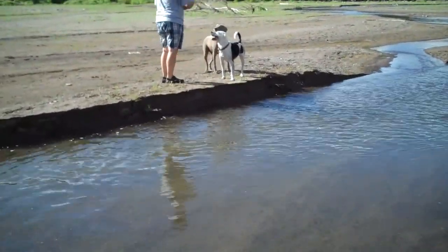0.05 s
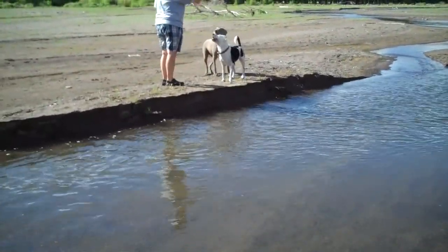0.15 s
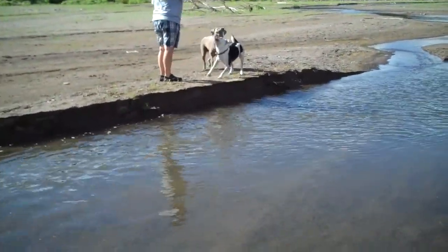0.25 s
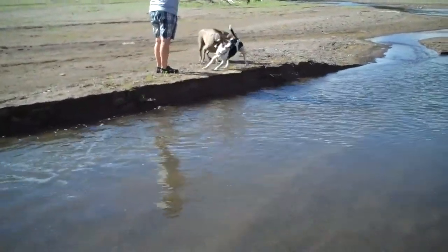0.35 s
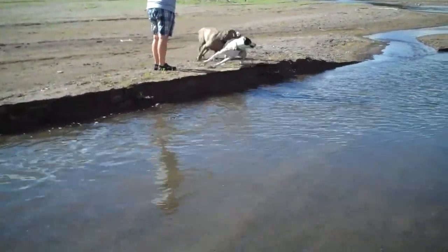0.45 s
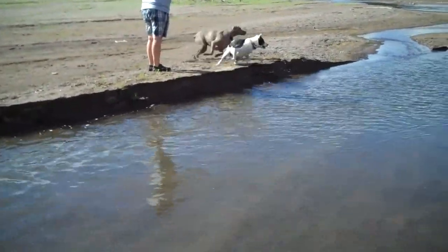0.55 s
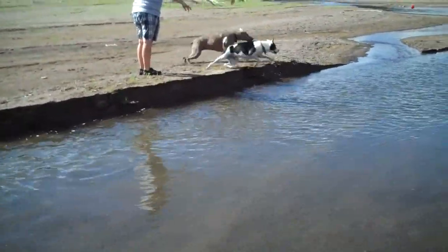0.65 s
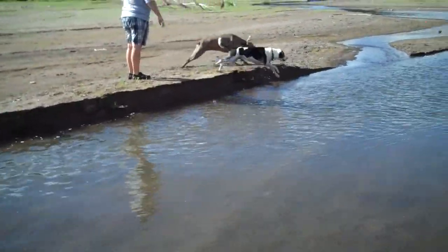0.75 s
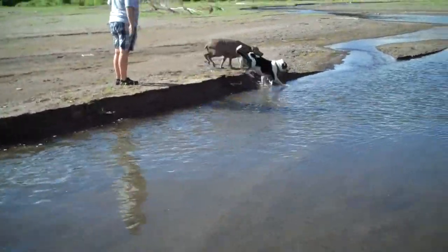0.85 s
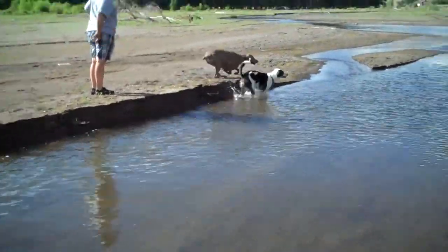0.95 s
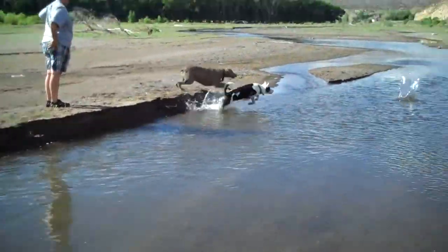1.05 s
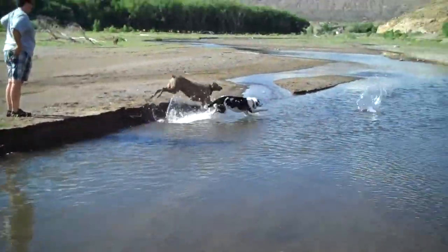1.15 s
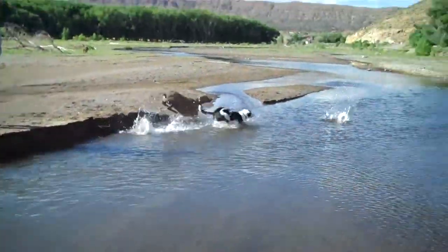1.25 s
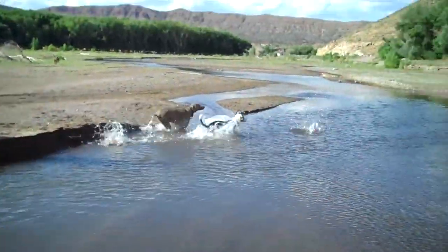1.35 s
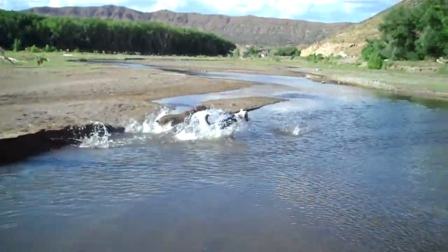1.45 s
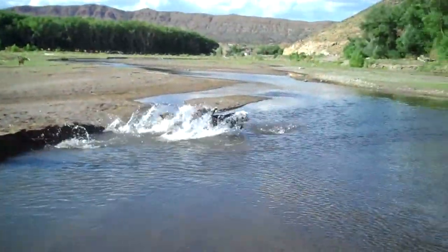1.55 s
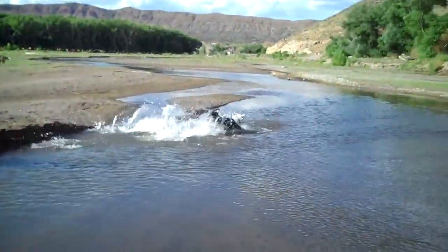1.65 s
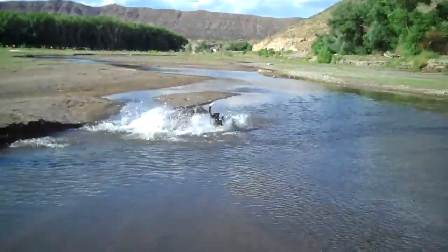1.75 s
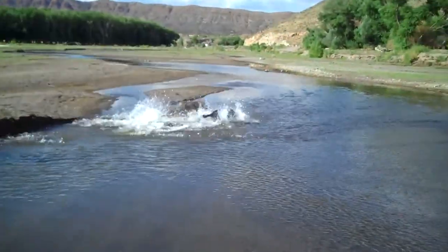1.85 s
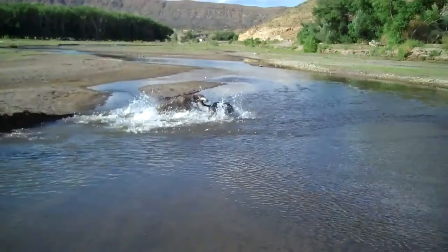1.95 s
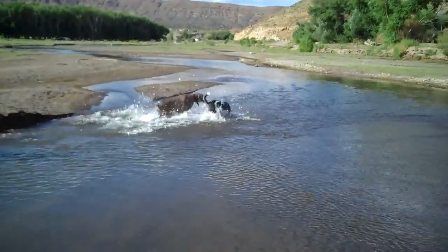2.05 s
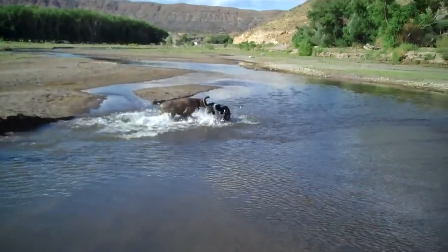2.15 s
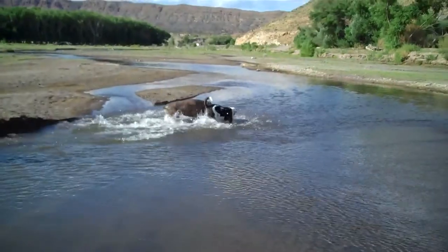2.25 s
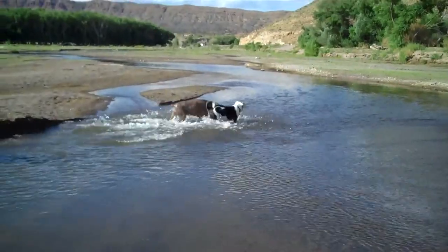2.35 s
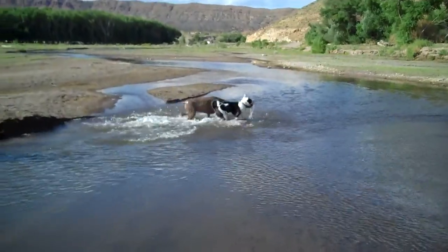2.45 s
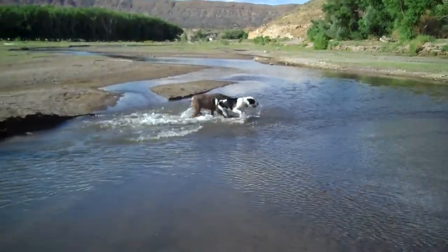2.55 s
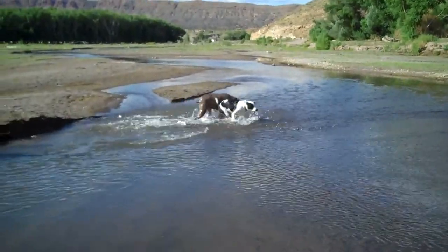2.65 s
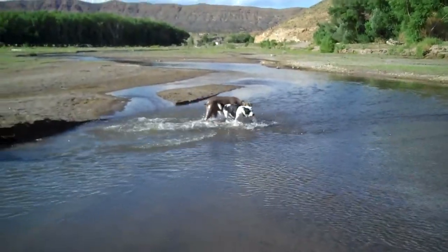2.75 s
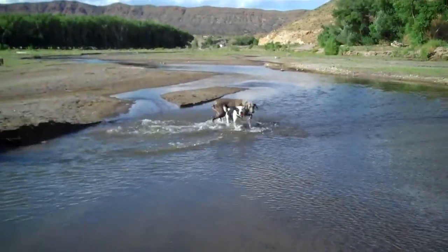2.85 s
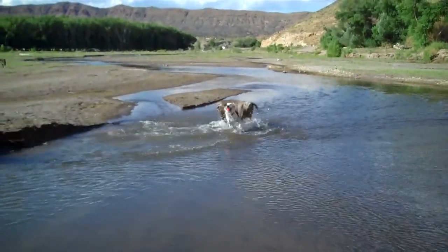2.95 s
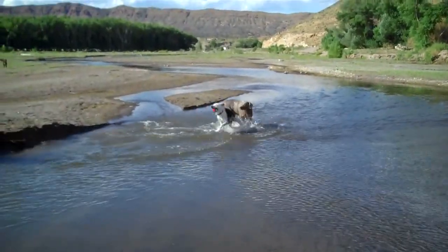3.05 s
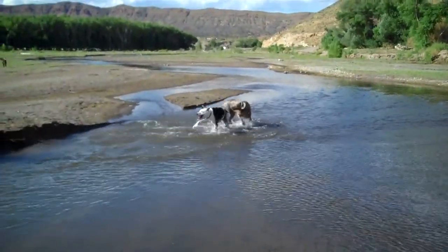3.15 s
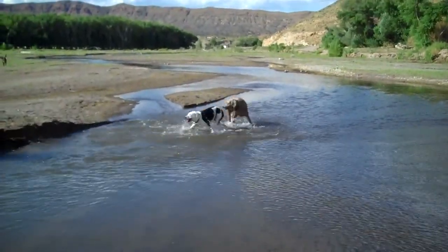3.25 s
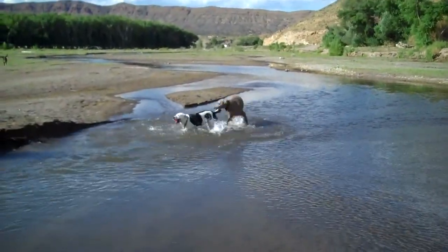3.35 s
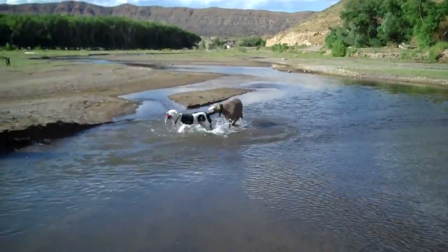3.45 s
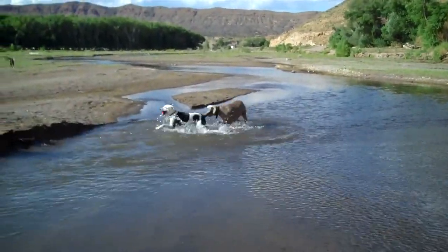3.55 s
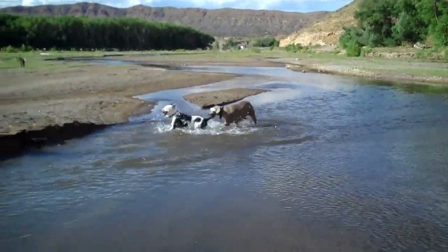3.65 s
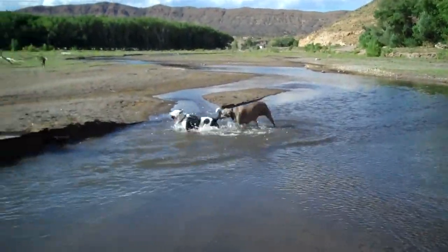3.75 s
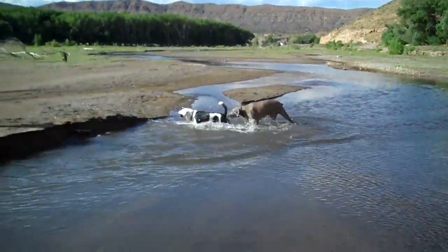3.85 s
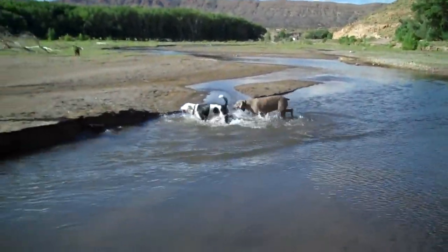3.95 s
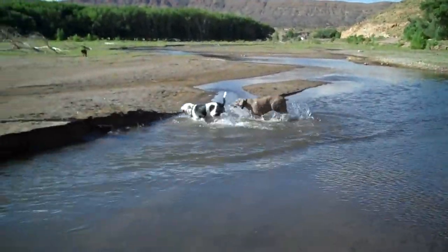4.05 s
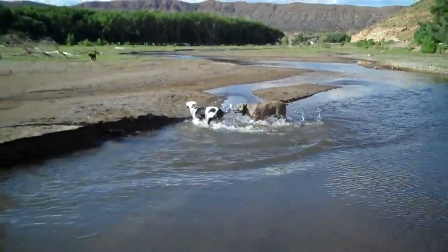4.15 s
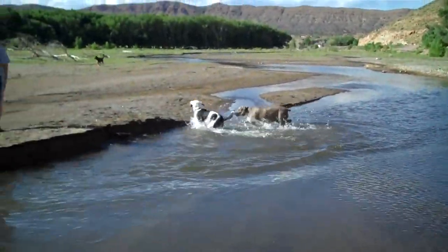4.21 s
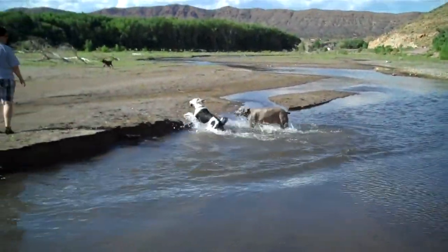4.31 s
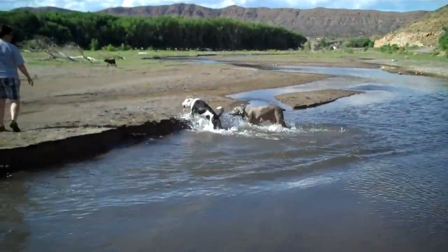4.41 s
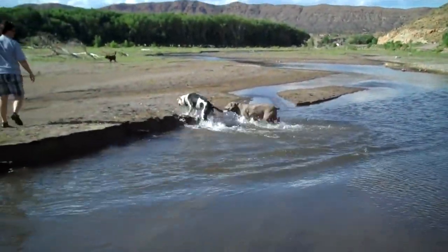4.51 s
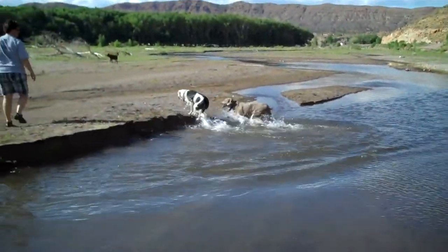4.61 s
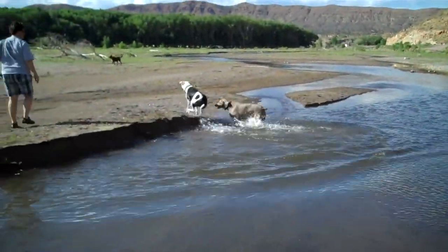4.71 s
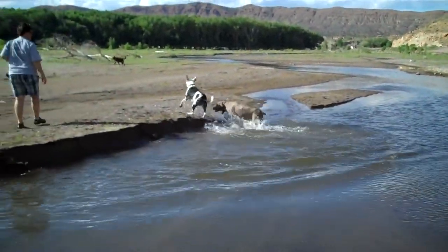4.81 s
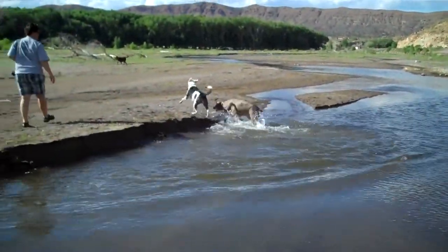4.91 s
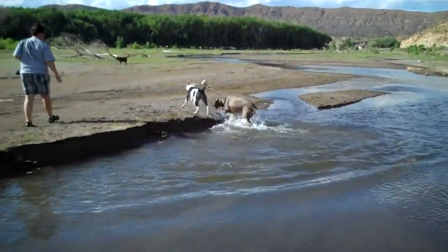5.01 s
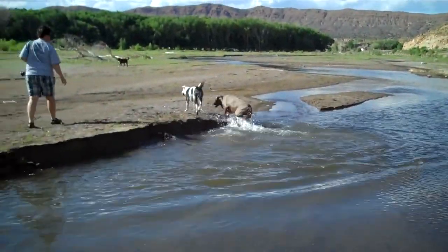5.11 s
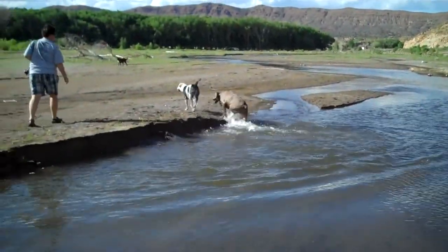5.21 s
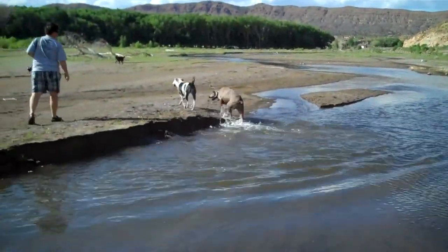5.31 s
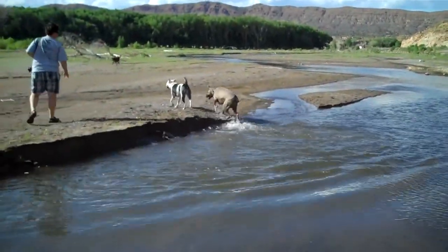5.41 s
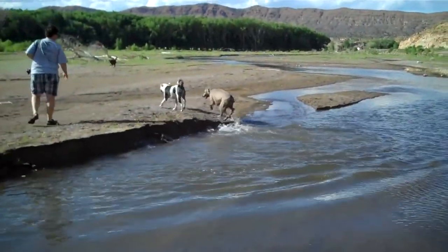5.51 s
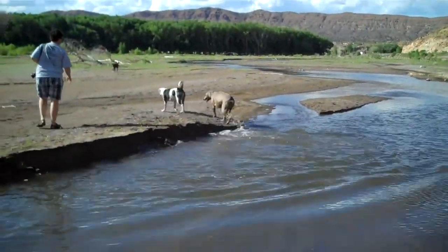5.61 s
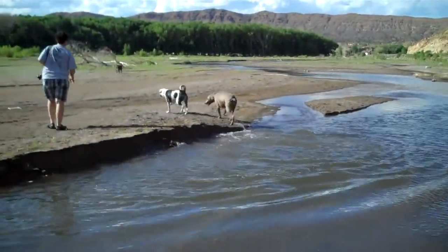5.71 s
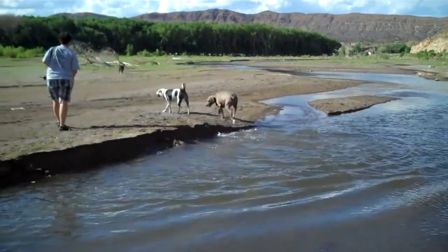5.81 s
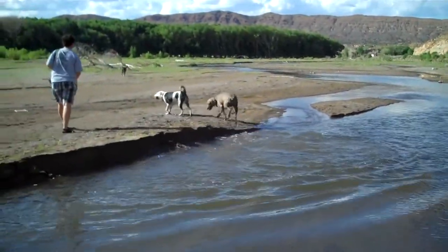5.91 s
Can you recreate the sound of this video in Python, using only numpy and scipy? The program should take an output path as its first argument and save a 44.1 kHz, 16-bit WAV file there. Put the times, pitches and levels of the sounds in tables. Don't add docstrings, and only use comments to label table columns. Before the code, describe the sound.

An open riverside, heard through a small handheld stereo camera microphone some metres away. At first there is only a smooth far water hiss, low wind buffets and a few tiny ticks. From about 0.7 s grit crackles off the mud bank as two dogs leap; at 1.0 s a hard, crisp slap opens the splashing. Between 1.2 and 2.1 s it is thickest: bright fizzing spray, pattering drops, dull paw slaps and hollow gulps of trapped air. From 2.3 to 3 s it thins to sloshing and separate bubbles. Fresh slaps and plops come at 3.0, 3.45, 3.7 and 3.9 s, with wind thumps around 3.2 to 3.4 and at 3.8 s. Splashing swells again from 4.0 to 4.9 s while wet coats trickle. After 5 s it falls away to a small slap, drips, little bubbles, a rising plop near 5.75 s, and grit ticks.

```python
import sys
import numpy as np
from scipy import signal
from scipy.fft import rfft, irfft, next_fast_len
from scipy.io import wavfile
from scipy.ndimage import uniform_filter1d

SR = 44100
rng = np.random.default_rng(int(sys.argv[2]) if len(sys.argv) > 2 else 0)


def invert_db(x):
    u = np.asarray(x, float) / 20
    return 10 ** u


def to_wav(s):
    ch = np.atleast_2d(s).T
    pcm = np.round(np.clip(ch, -1, 1) * 32767)
    wavfile.write(sys.argv[1], SR, pcm.astype(np.int16))


N = 263404


def evened(x):
    return x / np.sqrt(np.mean(x ** 2, axis=-1, keepdims=True) + 1e-20)


def read(points, hz):
    point_hz, value = np.transpose(points)
    return np.interp(np.log(hz + 1), np.log(point_hz + 1), value)


def curve(table, column):
    rows = np.array(table)
    return np.interp(np.arange(N) / SR, rows[:, 0], rows[:, column])


def add(mix, start_s, sound):
    part = mix[round(start_s * SR):][:len(sound)]
    part += sound[:len(part)]


def filtered(x, response):
    size = next_fast_len(N + 4096)
    return irfft(rfft(x, size) * response(np.fft.rfftfreq(size, 1 / SR)), size)[..., :N]


def causal(points):
    gain = invert_db(read(points, np.fft.rfftfreq(4096, 1 / SR)))
    cepstrum = irfft(np.log(gain))
    cepstrum[1:2048] *= 2
    cepstrum[2049:] = 0
    return irfft(np.exp(rfft(cepstrum)))[:2048]


def flutter(smooth_s, channels=1):
    size = max(round(smooth_s * SR), 2)
    once = uniform_filter1d(rng.standard_normal((channels, N)), size)
    return evened(uniform_filter1d(once, size))


def soft(sound):
    return sound * np.sqrt(np.hanning(len(sound)))


def ring(pitch_hz, rise_octaves, length_s):
    u = np.arange(max(round(length_s * SR), 4)) / (length_s * SR)
    phase = 2 * np.pi * np.cumsum(pitch_hz * 2 ** (rise_octaves * u)) / SR
    return np.sin(phase) * np.sin(np.pi * u ** 0.53) ** 1.26


def grains(tone, cycles, rise_octaves, per_s, spread_db, clump_db, clump_s, count=28):
    size = invert_db(spread_db * np.minimum(rng.exponential(1, N), 5)) * rng.choice([-1, 1], N)
    size *= (rng.random(N) < per_s / SR) * invert_db(clump_db * flutter(clump_s)[0])
    kind = rng.integers(0, count, N)
    out, power = np.zeros(N), 1e-3
    lowest_hz, highest_hz = tone[0][0], tone[-1][0]
    for k, hz in enumerate(np.geomspace(lowest_hz, highest_hz, count)):
        grain = ring(hz, rise_octaves, cycles / hz)
        grain = grain / np.linalg.norm(grain)
        out += signal.oaconvolve(size * (kind == k), grain)[:N]
        power = power + abs(rfft(grain, 4096)) ** 2

    def colour(hz):
        own = np.interp(hz, np.fft.rfftfreq(4096, 1 / SR), np.sqrt(power))
        return np.minimum(hz / lowest_hz, 1) ** 2 * invert_db(read(tone, hz)) / own
    return evened(filtered(out, colour))


def swells(peak_s, peak_db, fall_s, rise_share):
    t = np.arange(0, N / SR + .01, .002)
    late = (t - peak_s[:, None]) / np.maximum(fall_s, .01)[:, None]
    level_db = peak_db[..., None] - 10 * np.maximum(late, -late / rise_share)
    power = (invert_db(level_db) ** 2).sum(-2)
    return np.array([np.interp(np.arange(N) / SR, t, row) for row in np.atleast_2d(power)])


# [dB, how far legs work under the surface]
THRASHING = [(0, -80, 8), (.23, -60, -13), (.35, -41, -21), (.86, -47.5, -10), (.97, -63, -12),
             (1.13, -33, -1.5), (1.25, -33, -4.5), (1.5, -30.5, 0), (1.9, -28.5, -3), (2.3, -32, -2),
             (2.46, -37, -3.5), (3.0, -37.5, -2.5), (3.62, -37, -3.5), (4.0, -32, -7.5), (4.75, -32.5, -3),
             (5.3, -37.5, -6), (5.56, -43.5, -13.5), (5.97, -46.5, -19)]
# peak_s [s], effort_db [dB], depth_db [dB], fall_s [s per 10 dB]
LUNGES = [(.78, -39, -17, 0.17), (.935, -31, -20, 0.09), (1.009, -25.5, -9.5, 0.085),
          (1.058, -24.5, -4.5, 0.0478), (1.095, -37.5, 4, -0.0262), (1.211, -25, -10.5, 0.07),
          (1.279, -21.5, -18, 0.046), (1.33, -23, -7, 0.0726), (1.374, -22, -1.5, 0.052),
          (1.44, -29.5, 2.5, 0.0366), (1.561, -27.5, -2, 0.03), (1.648, -24.5, -8, 0.07),
          (1.71, -28.5, -16, 0.15), (1.76, -22.5, -8, 0.1358), (1.81, -39, 3, -0.01), (1.9, -37, 3.5, 0.08),
          (2.2, -38, 2, 0.06), (2.28, -36.5, -17.5, 0.06), (2.49, -37, -3.5, 0.05), (2.56, -37, -7.5, 0.13),
          (2.61, -34, -16, -0.3), (2.69, -33.5, -6.5, 0.12), (2.8, -39.5, 0, -0.1), (2.837, -32.5, 0, 0),
          (2.871, -34.5, 1.5, 0), (3.025, -31.5, -8, 0.09), (3.095, -29, -14, 0.01),
          (3.142, -29.5, -11, 0.04), (3.2, -41.5, 2, -0.03), (3.295, -30, -12, 0.07),
          (3.425, -23.5, -27, -0.0056), (3.452, -29, -2, 0.07), (3.52, -36, 0, 0.1),
          (3.682, -29, -5.5, 0.07), (3.82, -31.5, -1, 0.15), (4.09, -25.5, -7, -0.04),
          (4.199, -29.5, -2, 0.2453), (4.41, -35, -4, 0.09), (4.549, -32, -1, 0.1),
          (4.645, -31, -18.5, 0.07), (5.34, -35.5, -23, 0.08), (5.36, -36, -5.5, -0.04),
          (5.77, -40, -23, 0.02), (5.85, -46, -15, .04), (5.94, -50.5, -11, 0)]
# peak_s [s], effort_db [dB]
FLICKS = [(.24, -48), (.42, -40.5), (.53, -39), (0.886, -38), (1.48, -28), (1.72, -27), (1.836, -29),
          (2.008, -34), (2.098, -27.5), (3.386, -29), (3.56, -32.5), (3.87, -34), (3.934, -32),
          (4.133, -26), (4.452, -41), (4.884, -31), (4.964, -28.5), (5.453, -37), (5.752, -43)]
FLICK_DEPTH_DB, FLICK_FALL_S = -18.5, 0.019
LUNGE_RISE_SHARE = 0.52


def stirred(per_depth, steady_db=0):
    flicks = [(*row, FLICK_DEPTH_DB, FLICK_FALL_S) for row in FLICKS]
    peak_s, effort_db, depth_db, fall_s = np.transpose(LUNGES + flicks)
    steady = invert_db(steady_db + curve(THRASHING, 1) + per_depth * curve(THRASHING, 2))
    bursts = swells(peak_s, effort_db + per_depth * depth_db, fall_s, LUNGE_RISE_SHARE)[0]
    return np.sqrt(steady ** 2 + bursts)


# pitch_hz [Hz], level_db [dB]
SPRAY_TONE = [(700, -16), (1500, -4), (2300, 1), (4000, 0.5), (8000, -2.5), (16000, -6)]


def spray():
    fizz = grains(SPRAY_TONE, cycles=4.0, rise_octaves=.2, per_s=14000,
                  spread_db=1.5, clump_db=1.1, clump_s=.014)
    return invert_db(-4) * stirred(0) * fizz


# pitch_hz [Hz], level_db [dB]
CHURN_TONE = [(250, -22), (420, -7), (600, 1.5), (1200, -1), (2000, -5.5), (4000, -20.5), (8000, -22)]
# pitch_hz [Hz], level_db [dB]
SLOSH_TONE = [(90, -25), (150, -4.5), (280, 4.5), (400, 7.5), (700, -8.5)]
SLOSH_PER_DEPTH = 2.85
STEADY_SLOSH_DB = -3


def churn():
    small = grains(CHURN_TONE, cycles=5.0, rise_octaves=.3, per_s=4500,
                   spread_db=2.0, clump_db=1.05, clump_s=.012)
    large = grains(SLOSH_TONE, cycles=3.0, rise_octaves=.3, per_s=1300,
                   spread_db=1.8, clump_db=1.2, clump_s=.02, count=12)
    small = invert_db(-1.2) * stirred(1) * small
    return small + invert_db(-2.5) * stirred(SLOSH_PER_DEPTH, STEADY_SLOSH_DB) * large


# start_s [s], peak_db [dB], body_db [dB re spatter]
SLAPS = [(0.742, -27, -37), (0.868, -25, -38), (0.93, -22, -6), (0.9914, -21, -21), (1.0009, -6, -13),
         (1.0529, -9, -10), (1.176, -14, -12), (1.211, -11.5, -4), (1.267, -16, -19), (1.318, -19, -7),
         (1.371, -20, -16), (1.73, -21, -17), (3.012, -20.5, -7), (3.6597, -15, -30), (3.916, -12.5, -16),
         (4.0832, -22, 2), (4.38, -20, -22), (4.433, -28, -22), (4.988, -21.5, -7), (5.7664, -28, -29)]


def slaps():
    out, t = np.zeros(N), np.arange(3000) / SR
    body_band = signal.butter(2, [600, 2500], "band", fs=SR)
    for start_s, peak_db, body_db in SLAPS:
        hiss, lumps, thud = rng.standard_normal((3, len(t)))
        lumps_db = 4.0 * evened(uniform_filter1d(lumps, 30))
        spatter = hiss * invert_db(lumps_db) * invert_db(-60 * t / .028)
        body = evened(signal.lfilter(*body_band, thud)) * invert_db(-60 * t / .05)
        add(out, start_s, invert_db(peak_db - 11.0) * (spatter + invert_db(body_db) * body))
    return out


# peak_s [s], peak_db [dB], pitch_hz [Hz], length_s [s]
GULPS = [(0.186, -44, 377, 0.02), (1.01, -33, 625, .014), (1.06, -37, 744, 0.028), (1.09, -31, 494, 0.0258),
         (1.22, -33.5, 550, 0.024), (1.367, -31, 475, 0.022), (1.445, -25, 411, 0.028),
         (1.461, -27, 636, 0.03), (1.64, -28.5, 528, 0.02), (1.723, -21, 388, 0.0091),
         (1.854, -23.5, 272, 0.02), (1.921, -29.5, 303, .03), (2.216, -28, 693, 0.02),
         (2.65, -34, 590, .017), (2.753, -36, 486, 0.014), (2.858, -36, 519, 0.029),
         (3.085, -37, 580, .013), (3.194, -40.5, 554, 0.026), (3.45, -19.5, 488, 0.014),
         (3.503, -28.5, 496, 0.016), (3.595, -34.5, 597, 0.025), (3.858, -24, 423, 0.011),
         (4.19, -29, 446, 0.024), (4.286, -45, 550, 0.019), (4.535, -24, 363, 0.02),
         (4.558, -24, 436, 0.015), (4.779, -35.5, 570, .017), (5.037, -38, 560, 0.02),
         (5.125, -44.5, 257, 0.025), (5.919, -54, 643, 0.021)]
# peak_s [s], peak_db [dB], pitch_hz [Hz]
BUBBLES = [(0.9, -40, 755), (0.9, -41, 925), (1.157, -32.5, 916), (1.011, -28.5, 916), (1.041, -26.5, 1650),
           (1.059, -51, 2050), (2.804, -28, 873), (3.035, -35, 1020), (3.036, -31, 1660),
           (3.303, -34, 1020), (3.451, -30, 1710), (3.453, -32, 2040), (3.499, -32.5, 965),
           (5.208, -33.5, 1140), (5.346, -39, 1520), (5.52, -39, 2200), (5.067, -40, 1105),
           (5.249, -44, 1110), (5.42, -47, 990), (5.528, -44, 1580), (5.573, -47, 1190), (5.69, -49.5, 930),
           (5.758, -57, 2710), (5.845, -46, 2140), (5.946, -47, 1870), (5.822, -52, 960), (5.917, -48, 945),
           (5.928, -51, 1030), (5.939, -46.5, 1120)]
BUBBLE_S = 0.0132
# start_s [s], peak_db [dB], pitch_hz [Hz, at start], rise_octaves [octaves], length_s [s]
PLOP = (5.754, -40, 235, 1.45, .045)


def gulps():
    out = np.zeros(N)
    for peak_s, peak_db, pitch_hz, length_s in GULPS + [(*row, BUBBLE_S) for row in BUBBLES]:
        ring_s = np.clip(1.16 * length_s, .005, 14 / pitch_hz)
        gulp = soft(ring(pitch_hz * 0.945, 0.17, ring_s))
        add(out, peak_s - 0.389 * length_s, invert_db(peak_db + 4.0) * gulp)
    start_s, peak_db, pitch_hz, rise_octaves, length_s = PLOP
    add(out, start_s, invert_db(peak_db) * ring(pitch_hz, rise_octaves, length_s))
    return out


# peak_s [s], peak_db [dB], pitch_hz [Hz]
POCKETS = [(1.057, -39, 487), (1.059, -35.5, 233), (1.12, -34, 617), (1.561, -28, 400), (1.784, -30, 312),
           (1.796, -27, 630), (1.82, -29, 330), (1.918, -28, 595), (1.939, -32, 510), (2.044, -34.5, 606),
           (2.063, -30.5, 578), (2.288, -35, 510), (2.48, -38, 675), (2.811, -37, 670), (2.827, -35, 610),
           (2.871, -34, 720), (3.005, -40, 593), (3.046, -39, 565), (3.103, -38, 694), (3.254, -38, 500),
           (3.536, -34, 547), (3.706, -34.5, 584), (3.746, -37.5, 602), (3.834, -37, 610),
           (3.882, -31, 506), (3.921, -39, 710), (4.245, -41, 559), (4.278, -29.5, 590),
           (4.313, -29.5, 680), (4.371, -32.5, 633), (4.494, -34, 437), (4.558, -26, 630),
           (4.599, -37, 616), (4.8, -37, 503), (4.815, -32.5, 460), (4.831, -34, 670), (4.92, -46, 450),
           (4.928, -37, 667), (5.068, -36, 620)]
# peak_s [s], peak_db [dB], pitch_hz [Hz]
DRIPS = [(0.899, -42, 1959), (0.922, -41, 1580), (0.965, -38.5, 940), (0.99, -38, 2411),
         (1.01, -38.5, 2500), (1.011, -37, 2971), (1.018, -34, 1701), (1.019, -31, 2217),
         (1.032, -31, 1000), (1.057, -24.5, 1864), (1.208, -32, 2600), (1.321, -27, 2540),
         (1.331, -28, 2820), (1.347, -28, 1860), (1.348, -30, 2150), (1.377, -31, 3000), (1.38, -44, 925),
         (1.414, -26, 2380), (1.419, -27, 1560), (1.419, -27, 970), (1.449, -31, 970), (1.463, -27, 1480),
         (1.482, -30, 1510), (1.75, -28, 2777), (1.751, -26, 2170), (1.755, -31, 2350), (1.767, -35, 3060),
         (1.767, -30, 1750), (1.767, -32, 1390), (1.77, -36, 2000), (1.916, -28, 950), (2.231, -32.5, 2380),
         (2.495, -40, 3050), (2.803, -36, 2325), (2.831, -37, 3251), (3.033, -35.5, 2270),
         (3.106, -36, 1937), (3.295, -34, 3070), (3.448, -38, 2700), (3.452, -31.5, 3580),
         (3.454, -34, 2433), (3.777, -36, 1830), (3.793, -33, 1630), (3.797, -33, 2100), (3.827, -30, 1050),
         (4.294, -29.5, 1010), (4.41, -30, 1450), (4.531, -40, 2691), (4.54, -28.5, 1098),
         (4.554, -33, 980), (4.576, -31.5, 1550), (4.644, -32, 2368), (4.645, -31, 1080),
         (4.645, -35.5, 2120), (4.986, -36, 1430), (4.988, -38, 2971), (5.189, -35, 1570),
         (5.361, -43.5, 2100), (5.362, -43, 3140)]
POCKET_S, POCKET_DB, DRIP_S, DRIP_DB = .019, 1.5, .009, 3


def plunges():
    out = np.zeros(N)
    rows = [(s, db + POCKET_DB, hz, POCKET_S) for s, db, hz in POCKETS]
    rows += [(s, db + DRIP_DB, hz, DRIP_S) for s, db, hz in DRIPS]
    for peak_s, peak_db, pitch_hz, length_s in rows:
        climb, stretch = rng.random(2)
        rise_octaves = .45 * climb
        length_s = length_s * (.7 + .6 * stretch)
        sound = ring(pitch_hz * 2 ** (-.4 * rise_octaves), rise_octaves, length_s)
        add(out, peak_s - .4 * length_s, invert_db(peak_db) / abs(mirror(pitch_hz)) * sound)
    return out


# peak_s [s], peak_db [dB], pitch_hz [Hz]
GRIT = [(.3122, -28, 5450), (.5898, -28, 5680), (.7427, -21, 6520), (.8267, -28, 5990), (.8493, -28, 6510),
        (.8682, -25, 6590), (.8738, -25, 5810), (.8963, -24, 6290), (.9279, -22, 5790), (.9321, -20, 6600),
        (5.4042, -26, 5740), (5.6495, -31, 5890), (5.7705, -23, 5850), (5.7814, -28, 5990),
        (5.8636, -30, 6110), (5.9015, -26.5, 4460)]
# peak_s [s], peak_db [dB], pitch_hz [Hz]
TICKS = [(.9916, -13, 3590), (1.0024, -11, 6340), (1.0128, -10, 6320), (1.0546, -6, 6940),
         (1.1027, -15, 5930), (1.1764, -10, 5430), (1.211, -11, 5860), (1.2705, -11, 4620),
         (1.2863, -6, 6390), (1.7317, -9, 6480), (1.7361, -9, 6300), (1.962, -15, 5290),
         (2.1216, -16, 5510), (2.2987, -17, 5610), (2.4624, -23, 6460), (2.5912, -21, 6580),
         (2.6154, -20, 6800), (2.609, -21, 5650), (3.0157, -20, 6130), (3.0248, -17, 5840),
         (3.0341, -9.5, 6530), (3.0991, -19, 5490), (3.5241, -20, 6030), (3.6603, -13, 5470),
         (3.7187, -17, 5880), (3.9174, -11, 5700), (3.9243, -14, 6260), (4.0838, -15, 6570),
         (4.3811, -17, 6800), (4.731, -16, 6950),
         (0.24, -40, 6459), (0.3353, -30, 6373), (0.3434, -29, 6718), (0.4295, -28, 6459),
         (0.8374, -31, 6287), (1.0081, -13, 6632), (1.0704, -13, 4134), (1.2065, -14, 6400),
         (1.8686, -14, 5684), (1.9265, -15, 5943), (2.4081, -23, 5426), (2.7041, -22, 6201),
         (2.9346, -24, 6029), (3.0882, -21, 6115), (3.138, -21, 6890), (3.7574, -18, 6459),
         (4.4036, -18, 6718), (4.4493, -20, 6287), (4.5402, -18, 4995), (4.6783, -19, 5426),
         (4.8922, -20, 6201), (5.5763, -32, 6287), (5.7551, -30, 5426)]


def ticks():
    out = np.zeros(N)
    for peak_s, peak_db, pitch_hz in GRIT + TICKS:
        tick = ring(pitch_hz, 0, 3.6 / pitch_hz)
        tick[len(tick) // 3] += 1.7
        port_db = (read(LEFT_PORT, pitch_hz) + read(RIGHT_PORT, pitch_hz)) / 2
        add(out, peak_s - .0006, invert_db(peak_db - port_db - 1.3) * tick)
    return out


# start_s [s], level_db [dB rms], pitch_hz [Hz], width_hz [Hz], length_s [s]
SIZZLES = [
    (3.405, -38, 5400, 400, .05),
    (1.747, -28, 2500, 800, .03),
    (3.349, -40, 9500, 150, .012),
]


def sizzle():
    out, t = np.zeros(N), np.arange(N) / SR
    for start_s, level_db, pitch_hz, width_hz, length_s in SIZZLES:
        noise = rng.standard_normal(N)
        band = evened(filtered(noise, lambda hz: np.exp(-((hz - pitch_hz) / width_hz) ** 2)))
        out += invert_db(level_db) * band * np.sin(np.pi * np.clip((t - start_s) / length_s, 0, 1))
    return out


# pitch_hz [Hz], level_db [dB]
TRICKLE_TONE = [(700, -13.5), (1100, -3), (1700, -1), (2600, -7), (3800, -18)]
# start_s [s], level_db [dB]
TRICKLE = [
    (2.3, -68),
    (2.6, -52),
    (4.0, -40.5),
    (4.6, -46.5),
    (5.2, -43),
    (5.6, -53.5),
]


def trickle():
    bubbles = grains(TRICKLE_TONE, cycles=7, rise_octaves=.35, per_s=1100,
                     spread_db=2.4, clump_db=1.8, clump_s=.02, count=14)
    return invert_db(curve(TRICKLE, 1)) * bubbles


MIRROR_S, MIRROR_TURN, MIRROR_FADE_HZ, MIRROR_SHARE = 0.002142, 0.21, 1510, 0.42


def mirror(hz):
    share = MIRROR_SHARE * np.exp(-(hz / MIRROR_FADE_HZ) ** 2)
    echo = share * np.exp(2j * np.pi * (MIRROR_TURN - hz * MIRROR_S))
    return (1 + echo) / np.sqrt(1 + share ** 2)


# pitch_hz [Hz], likeness [0..1]
LIKENESS = [(300, .996), (1500, .989), (3500, .9), (6500, .87), (8500, .7), (11000, .35), (14000, .15)]


def spread(x):
    z = signal.stft(x, nperseg=128, noverlap=96)[2]
    z = z * np.exp(2j * np.pi * rng.random(z.shape))
    scattered = 2 * signal.istft(z, nperseg=128, noverlap=96)[1][:N]
    shared = filtered(x, lambda hz: read(LIKENESS, hz))
    own = filtered(scattered, lambda hz: np.sqrt(1 - read(LIKENESS, hz) ** 2))
    return np.array([x, shared + own])


# pitch_hz [Hz], level_db [dB]
AIR = [(100, -14), (400, 10), (1000, 5), (2000, -2.5), (6000, -9), (9000, -0.5), (14000, 8.5)]


def air():
    hiss = filtered(rng.standard_normal((2, N)), lambda hz: invert_db(read(AIR, hz)))
    return invert_db(-50.5) * evened(hiss)


# peak_s [s], peak_db [dB], lean_db [dB, left minus right], fall_s [s per 10 dB]
WIND = [(.03, -59, 6, 0.56), (.2, -42.5, -9, 0.1), (.53, -49, 7.5, 0.2), (0.721, -50, -20, -0.97),
        (.95, -55, -2, 0.1), (1.08, -50, 10, -0.12), (1.68, -51, 0, 0.16), (1.95, -48, 14, 0.12),
        (2.91, -52, -28, -0.66), (3.13, -44, 11.5, 0), (3.37, -53.5, -5, 0.5), (3.81, -39, -13, -0.14),
        (4.215, -48, -19, 0.04), (4.32, -51.5, 8, 0.28), (4.86, -50, -21, -0.11), (4.96, -52, .1, .03),
        (5.17, -52, 0, .02), (5.29, -47, 3, 0), (5.449, -53, -34, -0.23), (5.58, -53, -7, 0.26),
        (5.67, -54, -27, -0.05)]
# pitch_hz [Hz], level_db [dB]
GUST_TONE = [(20, -20), (50, -2.5), (90, -1.5), (150, -8), (250, -16.5), (450, -25.5), (900, -48)]
# peak_s [s], peak_db [dB], pitch_hz [Hz], port [0 left, 1 right]
THUMPS = [(0.188, -31, 130, 1), (0.23, -36, 90.7, 1), (0.523, -29, 93, 1), (1.07, -37, 91, 0),
          (1.048, -40, 190, 0), (1.324, -31.5, 106, 1), (1.789, -28, 150, 1), (1.83, -33, 150, 0),
          (3.95, -34, 75, 0), (1.292, -36, 142, 0), (2.69, -31, 111, 0), (2.885, -29, 139, 1),
          (3.102, -32.5, 79.5, 0), (3.175, -24.5, 156, 0), (3.384, -22.5, 150, 0), (3.41, -31, 96, 1),
          (3.814, -17, 136, 1), (3.845, -20.5, 173, 1), (3.916, -26, 155, 0), (4.204, -30, 70, 1),
          (5.301, -33.5, 138, 0), (5.553, -36, 96, 0), (5.598, -34, 103, 0)]
GUST_RISE_SHARE, CALM_DB = 0.94, -69


def wind():
    lumps = rng.standard_normal((2, N)) * invert_db(2.5 * flutter(0.012, channels=2))
    rumble = evened(filtered(lumps, lambda hz: invert_db(read(GUST_TONE, hz))))
    peak_s, peak_db, lean_db, fall_s = np.transpose(WIND)
    port_db = peak_db + lean_db / 2 * np.array([[1], [-1]])
    gusts = swells(peak_s, port_db, fall_s, GUST_RISE_SHARE)
    out = rumble * np.sqrt(invert_db(CALM_DB) ** 2 + gusts)
    for knock_s, knock_db, pitch_hz, port in THUMPS:
        knock = soft(ring(pitch_hz * 1.62, -1.64, 2.64 / pitch_hz))
        add(out[port], knock_s - 1.09 / pitch_hz, invert_db(knock_db - 3.5) * knock)
    return out


def scene():
    impacts = filtered(slaps() + ticks(), lambda hz: 1 - np.exp(-(hz / 500) ** 2))
    water = spray() + churn() + impacts + gulps() + plunges() + sizzle() + trickle()
    return spread(filtered(water, mirror)) + air() + wind()


def roll_off(x):
    return signal.sosfilt(signal.butter(12, 16000, fs=SR, output="sos"), x)


# pitch_hz [Hz], gain_db [dB]
LEFT_PORT = [(300, -1), (4000, 2.5), (5500, 5.5), (6200, 8.5), (6900, 12.5), (7600, 8), (8500, 2),
             (10300, -7), (14150, -9.5), (14350, -31.5)]
RIGHT_PORT = [(300, -2), (4200, 2.5), (5000, 4.5), (5700, 9), (6200, 10.5), (6800, 3.5), (7400, -0.5),
              (8200, -8), (10500, -10.5), (12200, -18.5), (14150, -25), (14350, -31)]


def record(dry):
    ports = np.array([np.roll(causal(LEFT_PORT), 1), causal(RIGHT_PORT)])
    mix = signal.oaconvolve(dry, ports, axes=1)[:, :N]
    return roll_off(mix)


dry = scene()
out = record(dry)
to_wav(out)
```